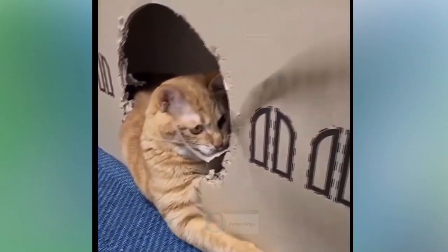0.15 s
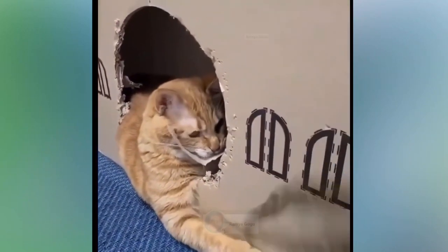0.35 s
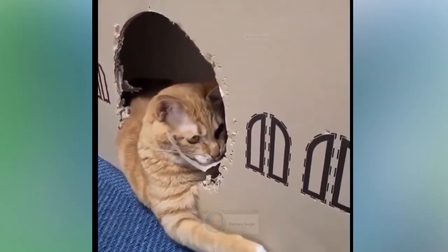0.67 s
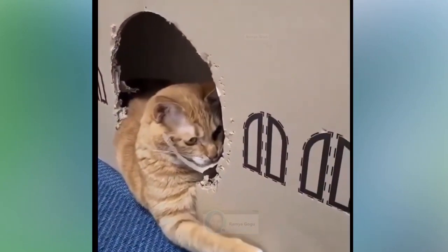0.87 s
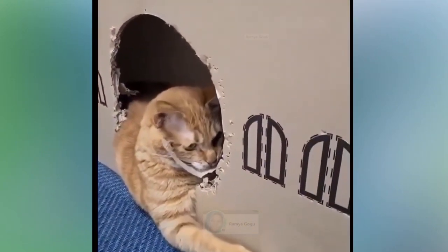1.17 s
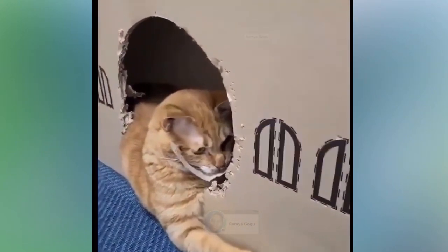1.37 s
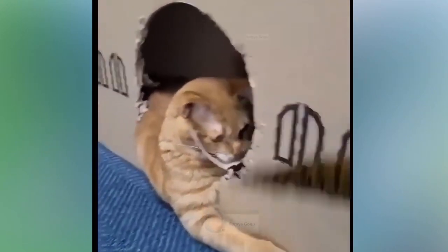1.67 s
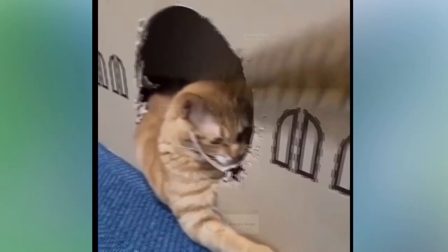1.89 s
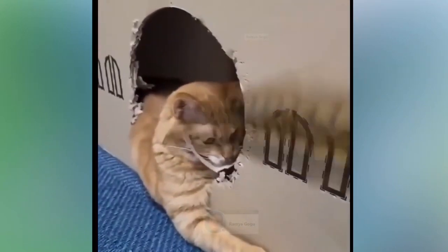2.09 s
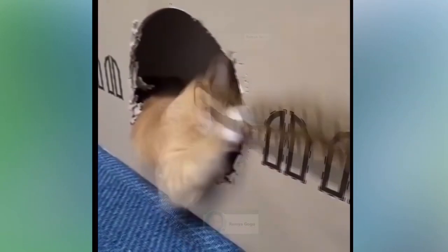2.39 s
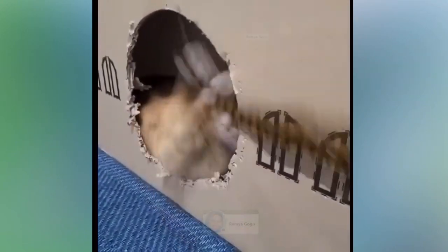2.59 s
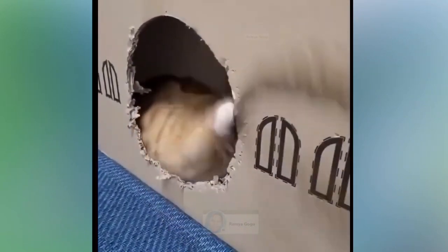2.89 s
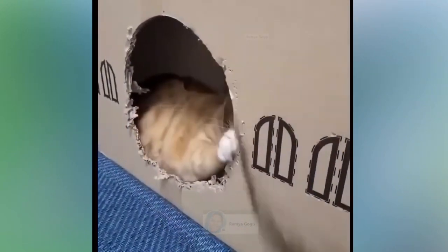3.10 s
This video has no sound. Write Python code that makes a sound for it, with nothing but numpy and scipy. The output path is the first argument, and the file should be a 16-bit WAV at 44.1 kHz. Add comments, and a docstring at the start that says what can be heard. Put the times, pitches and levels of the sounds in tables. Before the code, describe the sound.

A cat's paw scratches cardboard with faint dry rustling and small ticks, then quiet room hum remains, until a sudden flurry of hollow thumps, knocks and rasping claws, heard close in stereo in a small indoor room.

```python
"""Light dry rubbing and a few ticks on card come first, over a soft room tone with a humming motor; then the room
is left alone, until a cat in a cardboard box bats and claws: the walls boom, knock and rasp.
Paws and claws excite decaying modes of wall, panels and card; rubbing is grainy noise coloured by the card's modes.
Filtered noise and wavering harmonics make the room, decaying noise its short echo; two microphone ports hear it."""
import sys
import numpy as np
from scipy import signal
from scipy.fft import rfft, irfft
from scipy.io import wavfile
from scipy.ndimage import uniform_filter1d

SR = 44100
rng = np.random.default_rng(int(sys.argv[2]) if len(sys.argv) > 2 else 0)


def to_wav(sig):
    """Store sig (one row per channel, or 1-D mono) as 16-bit WAV at the path in sys.argv[1].

    Samples outside -1..1 are clipped; the rate is SR.
    """
    pcm = np.clip(np.atleast_2d(sig), -1, 1) * 32767
    pcm = np.round(pcm).astype(np.int16)
    wavfile.write(sys.argv[1], SR, pcm.T)  # frames by channels


N = 143325
T = np.arange(N) / SR

# modes of the stiff card near the claw, free of the paw:
# (frequency [Hz], relative level [dB], decay time T60 [s])
CARD = [(440, 6.5, 0.083), (511.6, 5, 0.046), (652, 3, 0.021), (830.5, 0, 0.037), (876, -4.5, 0.03),
        (1041, 7.5, 0.0083), (1337, 4.5, 0.011), (1503, -0.5, 0.0084), (1675, -3.5, 0.042),
        (2100, -31, 0.0078)]
# likeness of the left and right sound: (frequency [Hz], likeness [0-1])
LIKENESS = [(60, 0.98), (280, 0.79), (610, 0.25), (1300, 0.014)]


def undb(db):
    """Level to amplitude ratio: 20 dB is a factor of ten."""
    return 10 ** (np.asarray(db) / 20)


def along(table, hz):
    """Interpolation on a logarithmic frequency axis, of a (frequency [Hz], value) table."""
    points = np.array(table)
    return np.interp(np.log(np.maximum(hz, 1)), np.log(points[:, 0]), points[:, 1])


def shaped(x, colour):
    """Spectral shaping: each frequency is weighted by the colour, then the rms is set to 1."""
    gain = undb(along(colour, np.fft.rfftfreq(N, 1 / SR)))
    y = irfft(rfft(x) * gain, N)
    return y / np.sqrt(np.mean(y ** 2))


def ring(x, hz, t60):
    """Damped resonance: a two-pole mode answers a unit impulse with a decaying sine of unit amplitude."""
    radius = np.exp(-np.log(1000) / (t60 * SR))
    angle = 2 * np.pi * hz / SR
    return signal.lfilter([0, radius * np.sin(angle)], [1, -2 * radius * np.cos(angle), radius ** 2], x)


def walk(rate):
    """Slow random modulation: steps at the rate [Hz], smoothed twice, with a spread near 1."""
    step = int(SR / rate)
    held = np.repeat(rng.standard_normal(N // step + 1), step)
    return 1.37 * uniform_filter1d(uniform_filter1d(held, step), step)[:N]


def near(hz, struck_hz, reach):
    """Modal selection: modes within the reach [octaves] of the struck frequency take most of a blow."""
    return np.exp(-.5 * (np.log2(hz / struck_hz) / max(reach, .1)) ** 2)


def pair(a, b):
    """Partial coherence: the right port hears a late copy of the left, mixed with an unrelated part."""
    shared, port_lag_s = 0.057, .0005  # share of the power common to both ports
    late = np.roll(a, int(port_lag_s * SR))
    return np.array([a, np.sqrt(shared) * late + np.sqrt(1 - shared) * b])


def room_tone():
    """Diffuse field and harmonic series: soft noise, alike on both sides in the bass, over a wavering motor hum."""
    # colour of the noise: (frequency [Hz], relative level [dB])
    room_colour = [(15, -66), (25, -29), (40, -18.5), (54, 4), (91, -6.5), (121, -6.5), (146, -13),
                   (166, -9), (234, -5.5), (320, -16), (356, -11.5), (514, -14), (635, -14), (847, -22),
                   (1050, -19), (1130, -21.5), (1860, -23), (3400, -29.5), (5200, -41), (13400, -56.5)]
    # harmonics of the motor: (multiple of the fundamental [-], central level [dB rms])
    hum_harmonics = [(1, -65.5), (2, -64), (3, -66), (4, -71), (5, -70), (6, -71.5)]
    room_db, hum_hz = -50, 59.07  # central values, both wavering

    like = np.clip(along(LIKENESS, np.fft.rfftfreq(N, 1 / SR)), 0, 1)
    mid, side = rfft(rng.standard_normal((2, N)))
    opposed = side * np.sqrt(1 - like) * np.array([[1], [-1]])
    noise = irfft(mid * np.sqrt(1 + like) + opposed, N)

    turn = 2 * np.pi * np.cumsum(hum_hz * (1 + 0.0059 * walk(2.934))) / SR
    hum = 0
    for multiple, level_db in hum_harmonics:
        gain = undb(level_db + 4.4 * walk(6.8)) * np.sqrt(2)
        hum = hum + gain * np.sin(multiple * turn + 2 * np.pi * rng.random())
    return undb(room_db + 0.278 * walk(0.84)) * shaped(noise, room_colour) + hum


def friction(curve, colour, grain_db, grain_rate, waver_db, mids_below_hz):
    """Friction noise: uneven grains ring the card's modes; the level of each narrow band wavers at random."""
    between_db, waver_rate = -7, 55  # excitation between the card's modes; rate of the wavering [Hz]
    t, level_db, mids_db = np.array(curve).T
    grains = pair(*(undb(grain_db * walk(grain_rate)) * rng.standard_normal((2, N))))
    hz = np.maximum(np.fft.rfftfreq(N, 1 / SR), 1)

    # power response: a resonance peak per mode, then a smooth rise above the highest one
    modes = sum(1 / (1 + (2 * np.pi * (hz - f) * t60 / np.log(1000)) ** 2) for f, _, t60 in CARD)
    above = np.clip(hz / CARD[-1][0] - 1, 0, 1)
    spectrum = rfft(shaped(grains, colour)) * np.sqrt(undb(between_db) ** 2 + modes + above)

    out = 0
    for centre in 400 * 2. ** (np.arange(53) / 10):  # ten bands an octave
        band = np.cos(np.pi / 2 * np.clip(10 * np.log2(hz / centre), -1, 1)) ** 2
        tilt_db = np.interp(T, t, mids_db) / (1 + (centre / mids_below_hz) ** 4)
        band_waver_db = waver_db * np.clip(walk(waver_rate), -2.5, 1.3)
        out = out + undb(tilt_db + band_waver_db) * irfft(spectrum * band, N)
    # far down outside the curve, unless it lasts beyond 3 s and holds its last level
    after_db = level_db[-1] if t[-1] > 3 else -120
    return out * undb(np.interp(T, t, level_db, left=-120, right=after_db))


def light_rubbing():
    """Dry friction at light load: fine, fast grains on the card."""
    # course of the rubbing: (time [s], drive level [dB], mids against the treble [dB])
    rub_curve = [(0, -38.5, -8), (.016, -42.5, -13), (.058, -43.5, 1.5), (.063, -30, -19),
                 (.08, -34.5, -3.5), (.1, -37.5, 3.5), (.122, -43, 11.5), (.13, -50, 9), (.165, -52, -5),
                 (.187, -47, 4), (.193, -40, -4), (.22, -47, 2), (.25, -47, 8), (.262, -52.5, 22),
                 (.282, -53, 9), (.3, -47.5, 9), (.325, -67, 6), (.345, -55.5, 21), (.362, -51, 0),
                 (.378, -45.5, 3), (.394, -52.5, 10), (.402, -61, -11), (.451, -59.5, -12),
                 (.456, -41.5, -12), (.47, -45.5, -14), (.49, -43, -35), (.515, -61, -22), (.545, -70, -16),
                 (.6, -83, 0), (.68, -86, -4), (.705, -64, 14), (.74, -59, 9.5), (.772, -58.5, 9),
                 (.782, -72, 5), (.84, -93, 0)]
    # its colour: (frequency [Hz], relative level [dB])
    rub_colour = [(600, -14.5), (1200, -10.5), (2800, -11.5), (3700, -10), (4700, -1.5), (5800, -6.5),
                  (7400, -4.5), (8600, -11), (11000, -5), (12700, -2.5), (13300, -18), (13700, -53)]
    return friction(rub_curve, rub_colour, grain_db=1.4, grain_rate=900, waver_db=4.1, mids_below_hz=3600)


def fur_brushing():
    """Hair friction: fur brushing the cut edge hisses in the treble."""
    # course of the brushing: (time [s], drive level [dB])
    fur_curve = [(2.59, -82), (2.602, -63), (2.622, -56), (2.638, -69), (2.662, -69), (2.672, -55.5),
                 (2.724, -79), (2.766, -72), (2.776, -73), (2.784, -73), (2.794, -61), (2.84, -74),
                 (2.862, -45.5), (2.882, -71), (2.894, -58), (2.944, -68), (2.968, -53), (2.994, -61),
                 (3.01, -56), (3.066, -57.5), (3.188, -64.5), (3.194, -53), (3.204, -67), (3.212, -42.5),
                 (3.244, -58), (3.25, -52)]
    # its colour: (frequency [Hz], relative level [dB])
    fur_colour = [(4500, -30), (6500, 7), (8200, -2), (10500, 0), (12600, 4.5), (13300, -30), (13700, -40)]
    curve = [(t, level_db, 0) for t, level_db in fur_curve]
    return friction(curve, fur_colour, grain_db=2.5, grain_rate=540, waver_db=3., mids_below_hz=3000)


def rasp():
    """Rough friction: dragging claws and fur give slower, more uneven grains and a darker colour."""
    # course of the dragging: (time [s], drive level [dB], mids against the treble [dB])
    rasp_curve = [(2.44, -72, 6.5), (2.463, -44.5, -7), (2.468, -36.5, 7), (2.495, -49.5, -11),
                  (2.53, -60, -1), (2.6, -61.5, 5), (2.606, -46.5, 3), (2.63, -51, 5.5), (2.645, -51, 0),
                  (2.675, -41.5, -13), (2.71, -57.5, 2.5), (2.77, -57.5, 1.5), (2.778, -43.5, 5),
                  (2.79, -38.5, -6), (2.8, -35.5, -0.5), (2.825, -53, 0), (2.855, -56, 8.5),
                  (2.861, -33, -11), (2.885, -49.5, 1), (2.897, -37.5, 2), (2.925, -37.5, -7.5),
                  (2.95, -47.5, 3), (2.958, -41, -1.5), (2.995, -46.5, -4), (3.01, -32.5, -5),
                  (3.025, -35.5, -6.5), (3.05, -44, -3), (3.09, -46, -4.5), (3.1, -43, -3.5),
                  (3.15, -45.5, -14.5), (3.188, -49.5, 3.5), (3.2, -43.5, -2), (3.212, -41.5, -7.5),
                  (3.25, -42, 0.5)]
    # its colour: (frequency [Hz], relative level [dB])
    rasp_colour = [(300, -41.5), (600, -12.5), (850, 8.5), (1350, 0.5), (2300, 1), (4000, -5), (5300, -8),
                   (6500, -15.5), (8500, -22), (12500, -45)]
    return friction(rasp_curve, rasp_colour, grain_db=1.94, grain_rate=600, waver_db=4.9, mids_below_hz=2900)


def taps():
    """Contact time sets bandwidth: a skidding claw rings fewer card modes the longer it skids, and leaves a tick."""
    # claw taps: (time [s], knock level [dB rms], struck near [Hz], contact time [s],
    #             tick level [dB rms], tick centre [Hz], left over right [dB])
    claw_taps = [(0.112, -38, 910, 0.0012, -53, 3000, 2), (0.196, -51, 1300, 0.01, -47.5, 4400, -4),
                 (0.2365, -44, 780, 0.0029, -53, 3940, 0), (.244, -44.5, 785, 0.0022, -51, 6000, 0),
                 (0.2724, -34.5, 1140, 0.0017, -30.5, 4020, -1), (.313, -50, 1200, 0.0016, -47, 2510, 0),
                 (0.3353, -43.5, 677, 0.001, -37, 7950, 2), (0.337, -69, 2090, 0.0014, -39.5, 2770, -1.5),
                 (0.339, -66, 910, 0.0032, -38.5, 10300, -11), (0.383, -53.5, 854, 0.0017, -45, 4950, 0),
                 (2.466, -32.5, 716, 0.0021, -37, 4320, -2.5), (2.467, -49, 1710, 0.0024, -49.5, 9100, -1),
                 (2.604, -41.5, 554, 0.0035, -46, 5740, -3.5), (2.619, -44.5, 820, 0.0032, -43.5, 5230, 4),
                 (2.773, -29.5, 554, 0.0042, -48, 5230, -3.5), (2.776, -43.5, 1170, .0015, -62, 3000, 8),
                 (2.782, -38.5, 940, .002, -60, 3000, 6), (2.793, -39, 1070, 0.0031, -43, 2210, 1),
                 (2.799, -33, 524, 0.0071, -67, 2960, -4), (2.859, -41, 800, 0.00072, -49, 8000, -3),
                 (2.862, -39, 1010, 0.003, -50, 3920, 0.5), (2.873, -48, 1200, 0.0013, -52, 4000, -8),
                 (2.894, -36, 546, 0.0029, -32, 4100, -5), (2.908, -38.5, 900, 0.002, -48, 3500, -1),
                 (2.930, -35.5, 416, 0.0052, -50, 3370, -1.5), (2.932, -45, 1310, 0.0042, -55, 2700, 0),
                 (2.944, -39, 466, 0.0082, -68, 3500, -4), (2.9557, -37.5, 1440, 0.0016, -52, 2980, -3),
                 (2.977, -43, 810, 0.0022, -48.5, 5100, -2), (3.008, -38.5, 1350, 0.0028, -40, 4000, -5),
                 (3.010, -28, 810, 0.0055, -40.5, 3850, -3), (3.017, -41, 1750, 0.0049, -43.5, 3630, -1),
                 (3.026, -37, 860, 0.0029, -39.5, 2950, -1), (3.047, -48.5, 1290, 0.0071, -54, 4000, -5),
                 (3.093, -35, 660, 0.0018, -51, 4630, -1), (3.129, -49.5, 810, 0.0066, -69, 4040, 1),
                 (3.177, -49, 684, 0.0025, -61, 11000, -1), (3.194, -35, 885, 0.0019, -36.5, 4950, 4),
                 (3.241, -36, 490, 0.0078, -63, 3060, 7)]
    reach_oct, short_contact_s = 0.3, .003  # reach of a blow among the modes at this contact time
    damped = .6  # share of the decay time left under the paw
    detune = 0.025  # random detuning of the modes from tap to tap, up to this share
    out, u = np.zeros((2, N + SR)), T[:SR // 8]

    for t, knock_db, struck_hz, contact, tick_db, tick_hz, pan_db in claw_taps:
        noise = rng.standard_normal((2, len(u)))
        draws = 2 * np.pi * rng.random((len(CARD), 3))
        rise = u / (contact / 2)
        skid = rise * np.exp(1 - rise)  # peaks at half the contact time
        reach = reach_oct * (short_contact_s / contact) ** 0.53

        knock = 0
        for (f, level_db, t60), (start, side, shift) in zip(CARD, draws):
            f = f * (1 + detune * (shift / np.pi - 1))
            # phase between left and right, wider where they are less alike
            apart = (side - np.pi) * (1 - np.clip(along(LIKENESS, f) + .5, 0, 1))
            drive = skid * np.sin(2 * np.pi * f * u + start + np.array([[0], [apart]]))
            knock = knock + undb(level_db) * near(f, struck_hz, reach) * ring(drive, f, t60 * damped)
        span = int(2 * contact * SR)
        knock = undb(knock_db) * knock / np.sqrt(np.mean(knock[:, :span + SR // 200] ** 2))

        def tick_band(x, width):
            """Band-pass filtering about the tick's centre frequency."""
            edges = [tick_hz / width, min(tick_hz * width, .45 * SR)]
            return signal.sosfilt(signal.butter(N=2, Wn=edges, btype="band", fs=SR, output="sos"), x)

        snap = pair(*(skid ** 2 * noise))
        tick = tick_band(snap, 1.336) + undb(-13.5) * tick_band(snap, 4.1)
        tick = undb(tick_db) * tick / np.sqrt(np.mean(tick[:, :span] ** 2, axis=1, keepdims=True))
        a = int(t * SR)
        out[:, a:a + len(u)] += (knock + tick) * undb([[pan_db / 2], [-pan_db / 2]])
    return out[:, :N]


def thumps():
    """Modal impact: soft pads dent the panels inwards; the wall swings out half a panel cycle later."""
    # modes of the big wall: (frequency [Hz], relative level [dB], decay time T60 [s])
    wall_modes = [(69.04, 4.5, 0.43), (89, -2, 0.09)]
    # modes of the smaller panels: (frequency [Hz], relative level [dB], decay time T60 [s])
    panel_modes = [(104.3, -1.5, 0.152), (158.9, 3, 0.093), (202, -13.5, 0.18), (258.4, 1.5, 0.083),
                   (322.7, 0.5, 0.18)]
    # paw thumps: (time [s], wall drive [dB], panel drive [dB], panels struck near [Hz])
    paw_thumps = [(0.118, -44.5, -66, 126), (0.265, -52, -43, 160), (2.467, -21.5, -16, 121),
                  (2.608, -32.5, -19, 176), (2.620, -25, -21, 176), (2.634, -21.5, -26, 327),
                  (2.781, -44, -14.5, 236), (2.8007, -54, -12.5, 250), (2.812, -37, -32, 250),
                  (2.816, -24, -27, 193), (2.909, -36, -21.5, 264), (2.916, -25.5, -19, 165),
                  (2.929, -31.5, -20.5, 320), (2.941, -34, -56, 280), (2.964, -30.5, -27.5, 236),
                  (2.98, -22.5, -42, 191), (3.054, -26.5, -55, 200), (3.098, -26, -21.5, 143),
                  (3.189, -36, -29.5, 195), (3.236, -37, -30.5, 195)]
    push_s, stop_s = 0.004, 0.0013  # pad contact; decay of the wall's ring once the next paw lands
    reach_oct, box_lag_s = 0.36, 0.00037  # reach among the panel modes; bass lag of the right port

    out = np.zeros(N)
    push = np.hanning(int(push_s * SR) + 3)
    next_times = [row[0] for row in paw_thumps[1:]] + [N / SR]
    for (t, wall_db, panel_db, struck_hz), next_t in zip(paw_thumps, next_times):
        a, b = int(t * SR), int((t - .5 / struck_hz) * SR)  # wall start, panel start
        x = np.zeros(min(SR // 2, N - a))
        x[:len(push)] = push / push.sum()
        stop = np.exp(-np.maximum(T[a:a + len(x)] - next_t, 0) / stop_s)
        wall = sum(undb(d) * ring(x, f, t60) for f, d, t60 in wall_modes)
        panels = sum(undb(d) * near(f, struck_hz, reach_oct) * ring(x, f, t60) for f, d, t60 in panel_modes)
        out[a:a + len(x)] += undb(wall_db) * stop * wall
        out[b:b + len(x)] -= undb(panel_db) * panels
    return np.array([out, np.roll(out, int(box_lag_s * SR))])


def room_echo(box):
    """Reverberation: convolution with exponentially decaying noise, thinned in the bass."""
    echo_db, echo_t60_s = -10, .16
    u = T[:SR // 3]
    tail = rng.standard_normal((2, len(u))) * undb(-60 * u / echo_t60_s)
    tail = signal.sosfilt(signal.butter(N=2, Wn=600, btype="high", fs=SR, output="sos"), tail)
    tail = tail / np.sqrt(np.sum(tail[0] ** 2))
    return undb(echo_db) * signal.fftconvolve(box, tail, axes=1)[:, :N]


def scene():
    """Superposition: the sounds of the box, their echo and the room tone add."""
    box = light_rubbing() + fur_brushing() + rasp() + taps() + thumps()
    return room_tone() + room_echo(box) + box


def record(dry):
    """Linear filtering: the two microphone ports differ a little in colour; deep bass and the top are cut."""
    # balance of the ports: (frequency [Hz], left over right [dB])
    balance = [(60, -1.9), (130, -1.9), (250, -3), (500, -1.3), (1000, 1.1), (2500, -1.4), (7000, 1.9),
               (12000, 1.1)]
    bass_cut_hz, top_hz = 64, 13600
    hz = np.maximum(np.fft.rfftfreq(N, 1 / SR), 1)
    tilt_db = along(balance, hz) / 2
    bass_cut = 1 / np.sqrt(1 + (bass_cut_hz / hz) ** 6)
    wet = irfft(rfft(dry) * undb([tilt_db, -tilt_db]) * bass_cut, N)
    return signal.sosfilt(signal.ellip(8, .2, 70, top_hz, fs=SR, output="sos"), wet)


dry = scene()
out = record(dry)
to_wav(out)
```